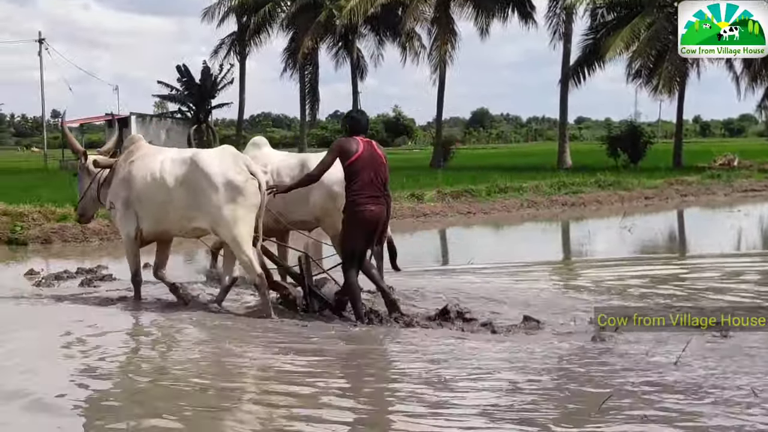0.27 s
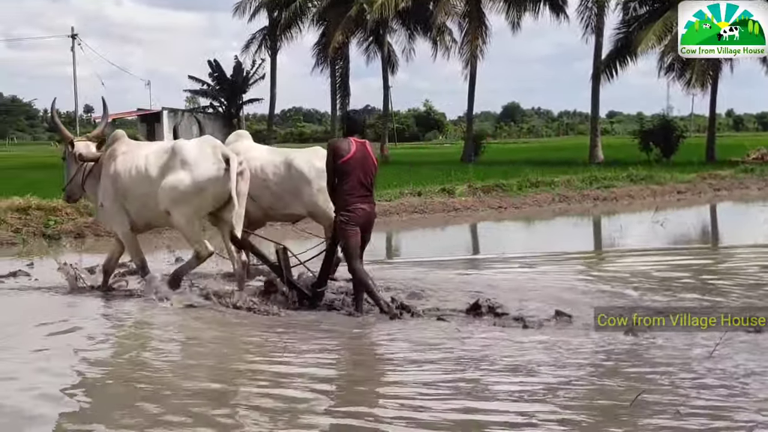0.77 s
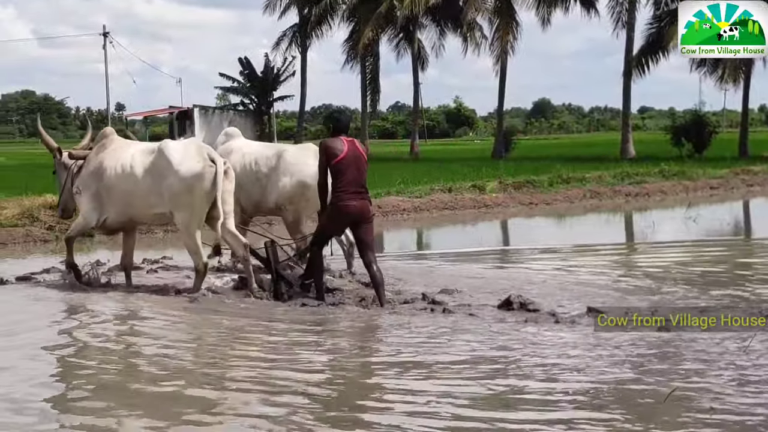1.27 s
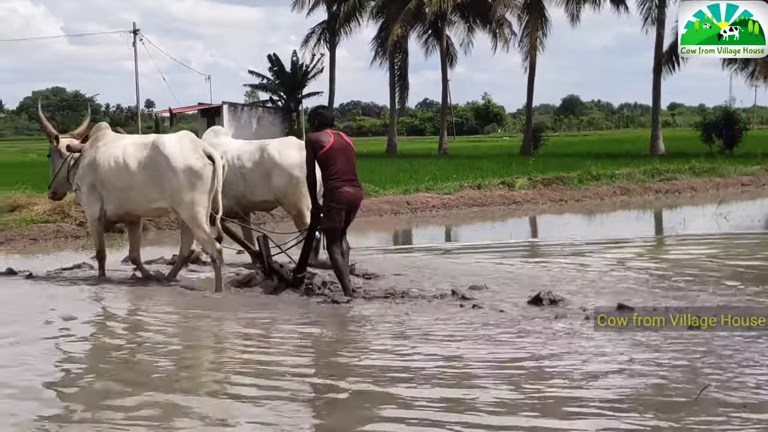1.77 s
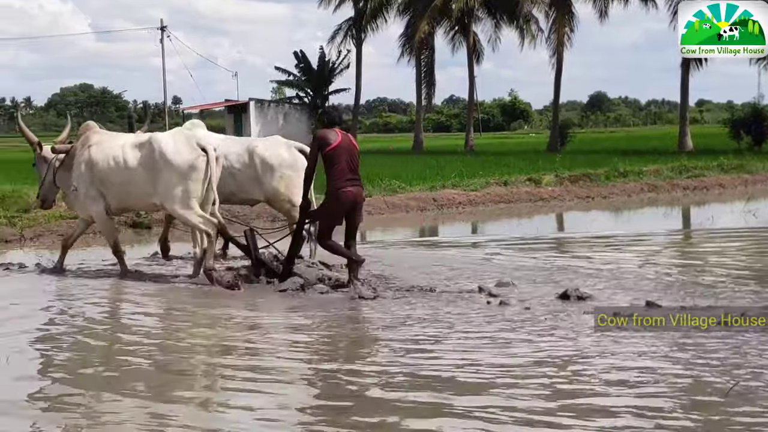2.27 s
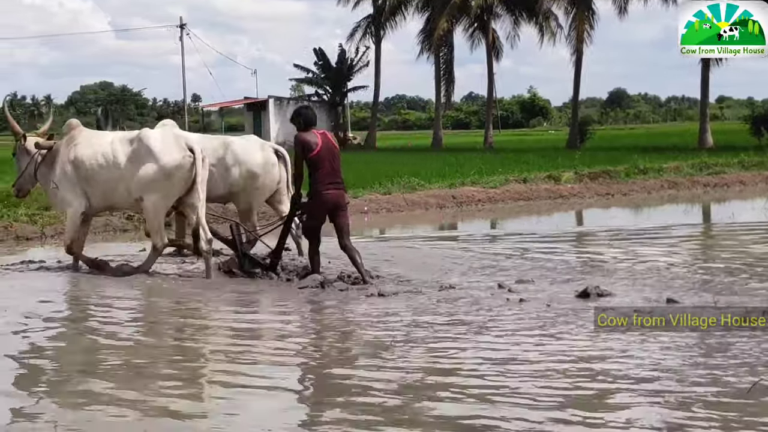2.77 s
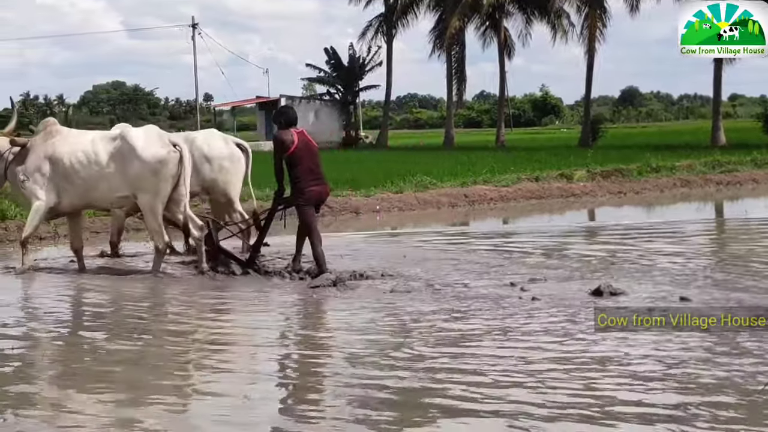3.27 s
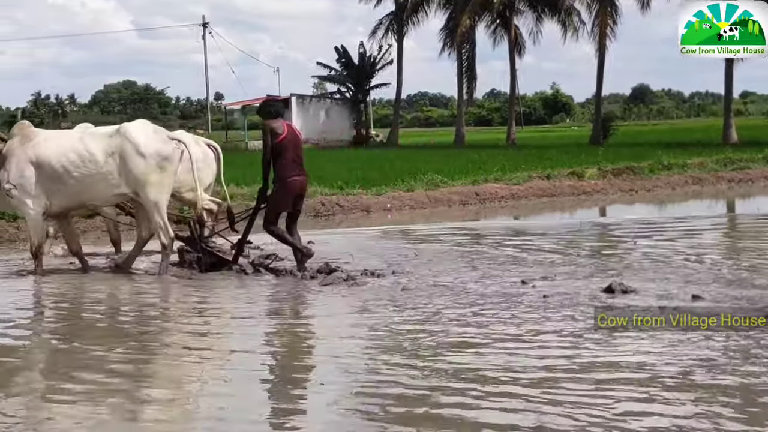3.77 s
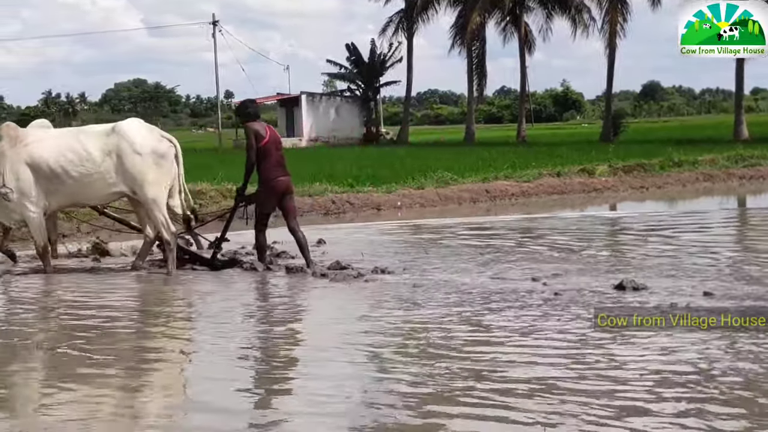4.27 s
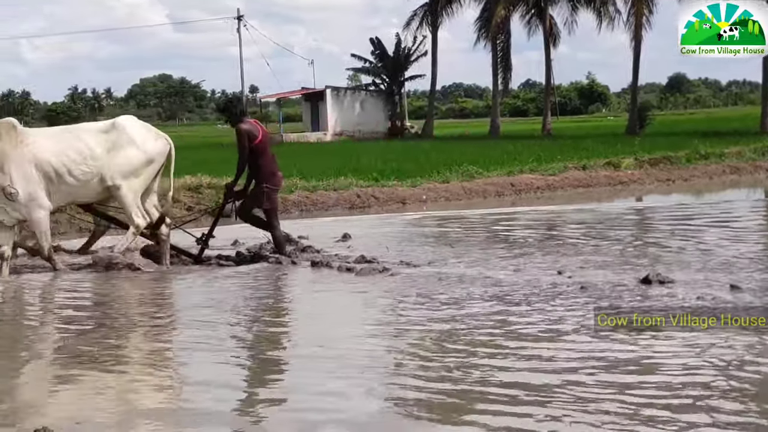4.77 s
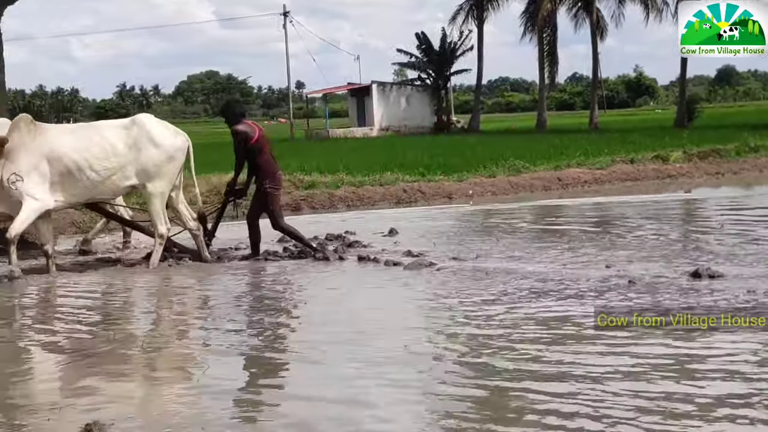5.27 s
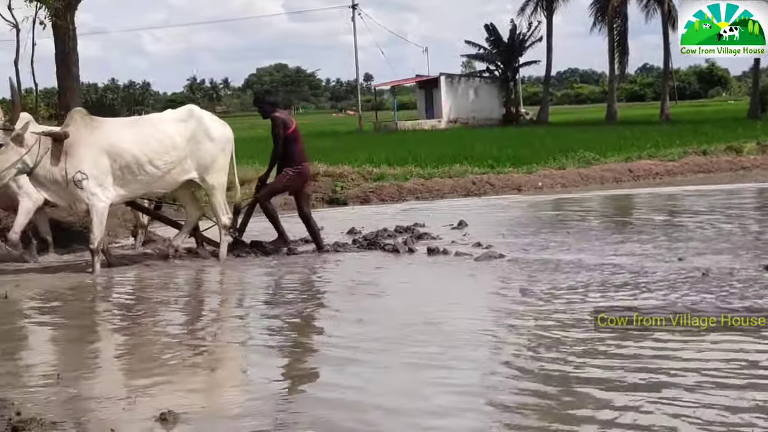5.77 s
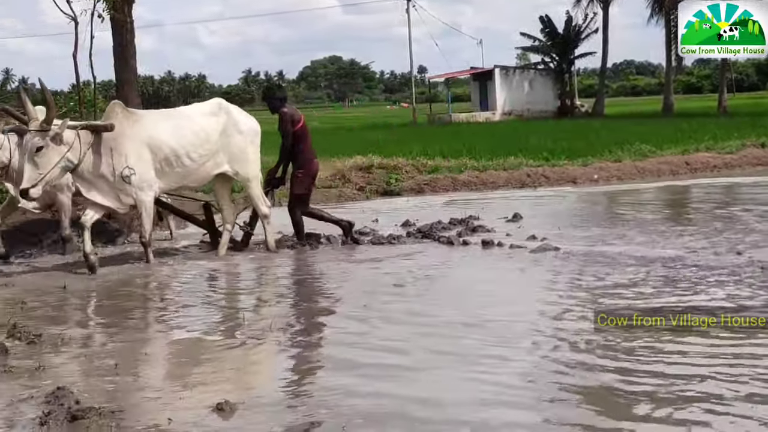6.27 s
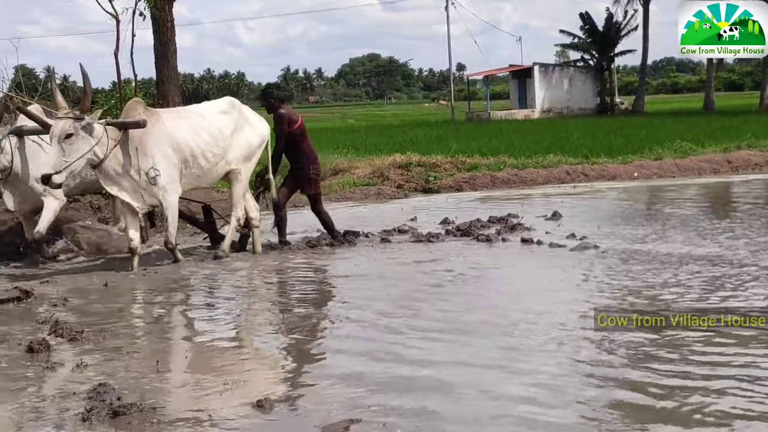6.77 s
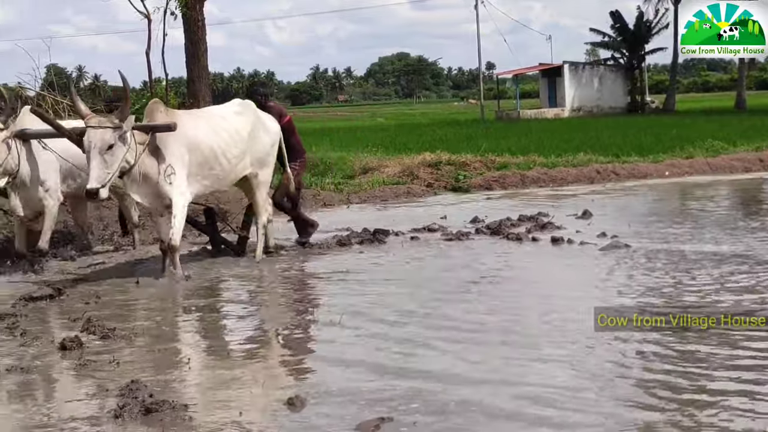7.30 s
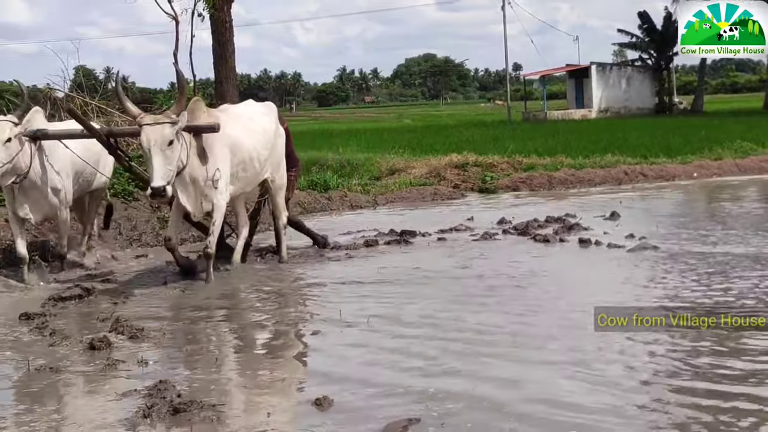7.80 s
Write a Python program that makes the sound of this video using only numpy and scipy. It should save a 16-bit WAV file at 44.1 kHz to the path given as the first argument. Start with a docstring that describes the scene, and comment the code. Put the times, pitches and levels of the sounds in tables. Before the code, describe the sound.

Two bullocks and a person wade with a plough through a flooded, muddy field, some metres from the microphone. For all eight seconds the water sloshes, gurgles and trickles, swelling softly with steps about two to four times a second. Hooves and feet make bubbly plops, the clearest near 0.3, 1, 1.2, 3 and 7.1 seconds. Thicker churns of mud come around 0.5, 4, 4.4, 5.3, 6.4 and 7.8 seconds. Thrown water lands in short, light smacks, sharper between about 4.8 and 7.4 seconds.

Over this, wind buffets the microphone with a lumpy low rumble, harder on the left. It is gusty from the start, with a few dull thumps in the first 1.5 seconds, and stays uneven until about 4 seconds. It eases around 5 to 6.7 seconds, then returns with gusts near 6.9 and 7.7 seconds.

```python
"""A flooded muddy field: two bullocks and a plough wade through it, some metres from a phone.
Legs and plough churn mud and water into rushing noise, ringing bubbles and droplets.
Hooves and feet trap big bubbles that plop; thrown water lands in short smacks.
Wind eddies buffet the two microphone ports with a lumpy rumble, the left one harder."""
import sys
import numpy as np
from scipy import signal
from scipy.fft import rfft, irfft, next_fast_len
from scipy.io import wavfile
from scipy.ndimage import uniform_filter1d, map_coordinates

SR = 44100
rng = np.random.default_rng(int(sys.argv[2]) if len(sys.argv) > 2 else 0)


def wrap_up_sound(samples):
    """Save the sound to the file named by the first command line argument, as 16-bit audio."""
    columns = np.atleast_2d(samples).T
    # keep every value between -1 and 1, then stretch to whole-number steps
    tamed = np.clip(columns, -1, 1)
    steps = np.round(tamed * 32767).astype(np.int16)
    wavfile.write(sys.argv[1], SR, steps)


N = 354519
CONTROL_HZ = 200


def amp(db):
    return 10 ** (np.asarray(db) / 20)


def unit_rms(x):
    return x / np.sqrt(np.mean(x ** 2, axis=-1, keepdims=True) + 1e-20)


def log_interp(points, hz):
    """(freq_hz, value) points read on a log axis."""
    freq_hz, values = np.transpose(points)
    return np.interp(np.log(hz + 1), np.log(freq_hz + 1), values)


def curves(rows):
    """One value per sample for each column after time_s."""
    time_s, *columns = np.transpose(rows)
    return [np.interp(np.arange(N) / SR, time_s, column) for column in columns]


def wobble(rate_hz):
    """Smooth random curve through knots at rate_hz."""
    knots = rng.standard_normal(int(N * rate_hz / SR) + 4)
    return map_coordinates(knots, [np.arange(N) * rate_hz / SR])


def filtered(x, response):
    """FFT filter with gain response(hz)."""
    size = next_fast_len(N + SR // 2)
    return irfft(rfft(x, size) * response(np.fft.rfftfreq(size, 1 / SR)), size)[..., :N]


def low(hz, edge_hz):
    """Low-pass gain of a crossover."""
    return 1 / np.sqrt(1 + (hz / edge_hz) ** 8)


def high(hz, edge_hz):
    """High-pass gain of a crossover."""
    return np.sqrt(1 - low(hz, edge_hz) ** 2)


def layered(x, body, top):
    """Dull band times body, bright band times top, middle band times their geometric mean."""
    dull, middle, bright = filtered(
        x, lambda f: np.array([low(f, 2690), high(f, 3110) * low(f, 5170), high(f, 5060)])[:, None])
    return dull * body + middle * np.sqrt(body * top) + bright * top


def minimum_phase(gain):
    """Gain curve with the phase of a body that rings only after it is struck."""
    cepstrum = irfft(np.log(gain))
    half = cepstrum.shape[-1] // 2
    return np.exp(rfft(cepstrum * np.r_[1, np.full(half - 1, 2), 1, np.zeros(half - 1)]))


def patchy_noise(depth_db):
    """Two white noises under one field of random time-frequency gain patches."""
    spectra = signal.stft(rng.standard_normal((2, N)), nperseg=256)[2]
    field = uniform_filter1d(rng.standard_normal(spectra.shape[1:]), size=6, axis=0)
    field = uniform_filter1d(field, size=8, axis=1)
    patched = spectra * amp(depth_db * field / field.std())
    return unit_rms(signal.istft(patched, nperseg=256)[1][:, :N])


def rings(start_s, level_db, pitch_hz, cycles, rise, samples):
    """Damped sines, two streams of unrelated phase; per lifetime: -21 dB, pitch up by the share rise."""
    age = np.arange(samples) / SR * (pitch_hz / np.maximum(cycles, .5))[:, None]  # in lifetimes
    start_turns = rng.random((len(start_s), 2)).T[:, :, None]
    phase = 2 * np.pi * (cycles[:, None] * (age + rise * age * age / 2) + start_turns)
    waves = amp(level_db[:, None] - 21.0 * age) * (1 - np.exp(-age / 0.026)) * np.sin(phase)
    index = (start_s * SR).astype(int)[:, None] + np.arange(samples)
    return np.array([np.bincount(index.ravel(), w.ravel(), N + samples)[:N] for w in waves])


def swarm(level_db, mid_hz, octaves, cycles, spread_db, clump, count, samples):
    """Random rings in clumps, crowding where the level is high, a few louder than the rest."""
    odds = np.cumsum(np.exp(clump * wobble(14)) * amp(.6 * level_db))
    when, strength, life = rng.random((count, 3)).T
    onset = np.minimum(np.searchsorted(odds, when * odds[-1]), N - 1)
    pitch_hz = np.minimum(mid_hz * 2 ** (octaves * rng.standard_normal(count)), 16000)
    ring_db = level_db[onset] - spread_db * np.log(strength + 0.02)
    return rings(onset / SR, ring_db, pitch_hz, cycles * (.5 + life), rise=0.16, samples=samples)


def buffet(level_db, upper_db):
    """Eddies on one port: lumpy rumble whose upper parts grow faster than the gust and come in spikes."""
    # wind spectrum on a port: freq_hz, gain_db
    rumble = [(7.1, -34), (12, -1.5), (45, -2), (90, -0.5), (185, -8.5), (292, -18.5), (412, -29),
              (600, -37), (780, -65), (1320, -120)]
    lumps, ragged_db = wobble(34), 2.16 * wobble(12)
    noise = unit_rms(filtered(rng.standard_normal(N), lambda f: amp(log_interp(rumble, f))))
    deep, edge = filtered(noise, lambda f: [low(f, 123), high(f, 196)])
    deep_eddies = unit_rms(amp(1.7 * lumps) * deep)
    spikes = 0.65 + 1.28 * np.tanh(deep_eddies / 2) ** 2  # fine eddies ride the crests of large ones
    upper = (noise - deep - edge) * amp(0.33 * lumps) + edge * spikes * amp(3.04 * lumps - 0.5)
    eddies = deep_eddies + upper * amp(0.81 * (level_db + 32) + upper_db)
    skewed = eddies + 0.05 * (eddies ** 2 - 1)  # peaks sharper than troughs
    return amp(level_db + ragged_db) * 5 * np.tanh(skewed / 5)


def slaps(gust_db):
    """Sudden eddies slap the left port, one short push each; small ones come at random with the gusts."""
    # big eddies: start_s, level_db
    eddies = [(0.349, -34), (0.634, -29), (0.967, -44), (1.082, -43), (1.311, -36), (1.381, -36),
              (1.47, -31.5), (3.125, -44), (7.58, -36)]
    start_s, level_db = np.transpose(eddies)
    pitch_hz, cycles = np.full(len(eddies), 170.), np.full(len(eddies), 1.3)
    big = rings(start_s, level_db + 12.5, pitch_hz, cycles, rise=0, samples=1200)[0]
    small = swarm(gust_db - 3.5, 209, octaves=.4, cycles=1.43, spread_db=3.0,
                  clump=.8, count=110, samples=1200)[0]
    return filtered(big + small, lambda f: low(f, 470))


def left_wind():
    """Gusts buffet and slap the exposed port."""
    # gust strength: time_s, level_db
    gusts = [(0.0, -31.5), (0.26, -35), (0.38, -27), (0.58, -31.5), (0.73, -26.5), (0.92, -43), (1.03, -31),
             (1.15, -38.5), (1.33, -31), (1.57, -30), (1.65, -37), (2.07, -30.5), (2.9, -31), (2.95, -46),
             (3.03, -53.5), (3.08, -28.5), (3.32, -28.5), (3.4, -34.5), (4.15, -35.5), (4.99, -38),
             (5.06, -43.5), (5.45, -50.5), (5.7, -44.5), (5.92, -35), (6.05, -40.5), (6.23, -47),
             (6.36, -40.5), (6.78, -50.5), (6.86, -29), (6.99, -32.5), (7.5, -31), (7.73, -24.5),
             (8.03, -34)]
    gust_db, = curves(gusts)
    return buffet(gust_db, upper_db=-1.0) + slaps(gust_db)


def right_wind():
    """The sheltered port catches separate puffs; each climbs to a peak and falls back to the calm."""
    # puffs: peak_s, level_db
    puffs = [(0.16, -34), (0.44, -26.5), (0.52, -31.5), (0.81, -31), (0.91, -38), (1.47, -41), (1.73, -36),
             (2.08, -36), (2.35, -32.5), (2.64, -34), (2.92, -35.5), (3.2, -37), (3.53, -35), (3.67, -35),
             (3.8, -34), (4.14, -35), (4.91, -43), (5.17, -41.5), (5.7, -40), (5.92, -37.5), (6.84, -34.5),
             (7.39, -39.5), (7.62, -41), (7.85, -40)]
    # wind between puffs: time_s, level_db
    calm = [(0.0, -44.5), (0.5, -37), (1.15, -44), (1.8, -43.5), (2.3, -41), (2.55, -46.5), (3.05, -49.5),
            (3.7, -39), (4.2, -45.5), (5.55, -56), (5.95, -41), (6.3, -49.5), (6.9, -44), (7.15, -54),
            (7.45, -44), (8.03, -46)]
    rise_db_per_s, fall_db_per_s = 204, 162
    peak_s, level_db = np.transpose(puffs)[:, :, None]
    t = np.arange(0, N / SR, 1 / CONTROL_HZ)
    ramps_db = level_db + np.minimum(rise_db_per_s * (t - peak_s), -fall_db_per_s * (t - peak_s))
    puff_db, = curves(np.transpose([t, ramps_db.max(axis=0)]))
    calm_db, = curves(calm)
    return buffet(np.maximum(puff_db, calm_db), upper_db=2.7)


def ports(pair):
    """Two unrelated streams become left and right: partly alike, then coloured by each port."""
    # left-right likeness of the water: freq_hz, correlation
    likeness = [(500, 1), (1000, 0.94), (1500, 0.74), (1780, 0.48), (2100, 0.49), (2450, 0.85),
                (2800, -0.18), (3250, 0.84), (3600, -0.42), (4250, 0.31), (4700, 0.85), (5200, 0.3)]
    # lift from the echo off the water and the phone's body: centre_hz, width_hz, left_db, right_db
    bands = [(818, 305, 7, 10.5), (1423, 365, 7.5, 9.5), (2174, 412, 8.5, 11), (3280, 370, 2, 4.5),
             (3964, 330, 2, 6.5), (4670, 270, 4.5, 10), (5730, 140, -2.5, 8), (11380, 710, 3, 7.5)]
    # left phase lead, a full turn across the ports' dip: freq_hz, lead_rad
    lead = [(1660, 0), (1800, 3.5), (2030, 5), (2300, 6.5), (2650, 6.5)]
    # left port response: freq_hz, gain_db
    left_port = [(300, -8), (600, -9), (2500, -6.5), (3000, -12), (8300, -12), (9600, -8.5), (14300, -8)]
    # right port response: freq_hz, gain_db
    right_port = [(300, -6.5), (600, -13.5), (2800, -11), (5500, -17), (8500, -18), (9500, -26.5),
                  (14300, -29.5)]

    def blend(hz):
        angle = np.arccos(np.clip(log_interp(likeness, hz), -1, 1)) / 2
        return [np.cos(angle), np.sin(angle)]

    def colour(hz):
        lift_db = sum(np.outer([left_db, right_db], np.exp(-2 * ((hz - centre_hz) / width_hz) ** 2))
                      for centre_hz, width_hz, left_db, right_db in bands)
        port_db = [log_interp(left_port, hz), log_interp(right_port, hz)]
        right_lag = np.exp(-1j * np.outer([0, 1], log_interp(lead, hz)))
        return right_lag * minimum_phase(amp(lift_db + port_db))
    mid, side = filtered(pair, blend)
    return filtered(np.array([mid + side, mid - side]), colour)


def smacks():
    """Thrown water lands: a short noise burst that trails into spray, bright top over a duller body."""
    # landings: start_s, level_db, t60_s, body_offset_db
    landings = [(0.2175, -49.5, 0.009, 8), (0.257, -46.5, 0.044, -3), (0.4625, -53, 0.026, -19),
                (0.9993, -50.5, 0.018, 2.5), (1.23, -45.5, .022, -13), (1.7225, -49, 0.024, -1.5),
                (2.571, -47.5, 0.014, -16), (3.924, -57, 0.022, 7.5), (4.8524, -38.5, 0.0062, -10.5),
                (5.1178, -45, .012, -3), (5.4817, -41.5, 0.0075, -30), (5.706, -42, 0.018, -22),
                (5.7416, -47, 0.0068, 1), (6.1774, -46.5, 0.012, -9), (6.397, -60, 0.009, 16),
                (6.8897, -48, .013, -5), (7.003, -44, 0.012, -6.5), (7.4081, -40, 0.012, -25),
                (7.737, -61, 0.012, 12), (7.985, -48, 0.018, -35), (8.007, -45, 0.024, -41)]
    top, body = np.full((2, N + SR), 1e-9)
    t = np.arange(SR // 8) / SR
    attack_s, spray_t60_s = 0.0013, 0.17
    for start_s, level_db, t60_s, body_offset_db in landings:
        decay = amp(-60 * t / max(t60_s, .004)) + 0.19 * amp(-60 * t / spray_t60_s)
        envelope = amp(level_db) * decay * (1 - np.exp(-t / attack_s))
        top[round(start_s * SR):][:len(t)] += envelope * amp(23.0)
        body[round(start_s * SR):][:len(t)] += envelope * amp(body_offset_db + 23.5)
    return layered(rng.standard_normal((2, N)), body[:N], top[:N])


def plops():
    """Hooves and feet trap a large bubble; the surface snaps briefly as it closes over."""
    # big bubbles: start_s, level_db, nominal_hz
    bubbles = [(0.018, -29.5, 1130), (0.167, -30, 2320), (0.262, -25, 2300), (1.001, -32, 2330),
               (1.231, -29.5, 2300), (1.723, -36, 2200), (1.937, -35.5, 833), (2.528, -32, 1220),
               (2.569, -32, 2280), (2.65, -35.5, 2180), (2.937, -30, 3340), (3.064, -37, 740),
               (3.088, -34.5, 2000), (3.182, -38, 2120), (3.245, -37, 1440), (3.258, -29.5, 4650),
               (3.317, -41, 1520), (3.411, -35, 2100), (3.924, -34, 2450), (3.938, -34, 870),
               (4.297, -34.5, 875), (4.332, -36.5, 665), (4.387, -35, 910), (4.587, -32.5, 1920),
               (4.985, -34, 2340), (5.018, -35.5, 1300), (5.25, -36, 834), (5.305, -38, 920),
               (5.641, -35, 2140), (5.696, -35, 700), (5.74, -38.5, 2200), (5.931, -31.5, 920),
               (6.332, -30.5, 543), (6.377, -38, 2130), (6.399, -33.5, 1000), (6.419, -36, 1550),
               (6.544, -38, 2250), (6.573, -40, 1010), (6.647, -45, 1500), (6.944, -33, 2300),
               (7.133, -28, 1660), (7.546, -34, 850), (7.644, -35, 2200), (7.678, -32.5, 2020),
               (7.704, -31, 1950), (7.736, -33, 675), (7.755, -39, 1360), (7.767, -42, 2250),
               (7.866, -38.5, 1550), (7.883, -39.5, 850)]
    start_s, level_db, nominal_hz = np.transpose(bubbles)
    cycles = 11 + nominal_hz / 500
    ring = rings(start_s, level_db - 1.0, nominal_hz * 0.964, cycles, rise=0.11, samples=1400)
    snap_hz = np.sqrt(nominal_hz * 1500) * 2 ** (0.27 * rng.standard_normal(len(bubbles)))
    snap = rings(start_s, level_db - 3.5, snap_hz, np.full(len(bubbles), 3.5), rise=0.03, samples=300)
    return ring + snap


def wading_db():
    """Mud, slosh and spray levels: each step swells quickly and settles a little more slowly."""
    # water between steps: time_s, mud_db, slosh_db, spray_db
    base = [(0.0, -57, -54, -58), (0.9, -57, -54.5, -58), (1.45, -57.5, -55.5, -59), (1.7, -59, -59, -63),
            (2.4, -60.5, -57.5, -62), (3.13, -62, -60, -65), (3.8, -66.5, -61.5, -66.5),
            (4.3, -62, -61, -64), (5.6, -61, -61, -63), (6.8, -60, -61.5, -60), (7.3, -61, -63, -63),
            (8.03, -61.5, -62, -60)]
    # a leg drives through the water: peak_s, mud_lift_db, slosh_lift_db, spray_lift_db
    steps = [(0.08, 3, 3, 1), (0.47, 7, 4, 2), (0.8, 3, 3, 0.5), (1.74, 2, 4, 3), (1.98, 5, 5, 2),
             (2.25, 2, 3.5, 2), (2.54, 5, 3, 1), (3.05, 4, 1, 0), (3.25, 5, 2, 0), (3.55, 4, 2, 2),
             (3.95, 10, 5, 2), (4.201, 0, 1, 4), (4.4, 10, 3, 1.5), (4.62, 4, 3.5, 4), (4.97, 4, 5, 5),
             (5.19, 0, 0, 3.5), (5.28, 8, 2.5, 1), (5.49, 0, 0.5, 5), (5.92, 6, 4, 3), (6.36, 7, 4, 2),
             (6.57, 4, 3, 2), (6.82, 3, 1, 1), (6.93, 4, 4, 4), (7.21, 5, 3, 1), (7.42, 2, 3, 5),
             (7.77, 7, 3.5, 1), (8.03, 0, 1, 5)]
    rise_s, fall_s = .04, .06
    peak_s, *lifts_db = np.transpose(steps)
    t = np.arange(0, N / SR, 1 / CONTROL_HZ)
    after_s = t - peak_s[:, None]
    swells = np.exp(-(after_s / np.where(after_s < 0, rise_s, fall_s)) ** 2)
    step_db = np.array(lifts_db) @ swells
    return np.add(curves(base), curves(np.transpose([t, *step_db])))


def churn():
    """Legs and plough push mud and water: rushing beds, with bubbles below and droplets above."""
    mud_db, slosh_db, spray_db = wading_db()
    surge = wobble(13)  # small waves break in every band at once
    mud = filtered(patchy_noise(depth_db=3.0), lambda f: low(f, 1710)) * amp(mud_db + 15.5 + 0.71 * surge)
    rush = filtered(patchy_noise(depth_db=2.0), lambda f: high(f, 1540)) * amp(0.95 * surge)
    rush = layered(rush, body=amp(slosh_db + 15.0), top=amp(spray_db + 18.5))
    gurgle = swarm(mud_db + 6.5, 919.5, octaves=0.566, cycles=11.1, spread_db=3.6,
                   clump=.8, count=900, samples=900)
    trickle = swarm(slosh_db + 9.5, 2366, octaves=0.407, cycles=14.3, spread_db=2.0,
                    clump=.6, count=1500, samples=400)
    drops = swarm(spray_db + 16, 6720, octaves=0.44, cycles=3.9, spread_db=4.5,
                  clump=.8, count=6000, samples=64)
    plinks = swarm(spray_db + 11.5, 4350, octaves=0.314, cycles=13, spread_db=3.5,
                   clump=.9, count=500, samples=300)
    return mud + rush + gurgle + trickle + drops + plinks


def scene():
    wind = np.array([left_wind(), right_wind()])
    water = churn() + plops() + smacks()
    return wind + ports(water)


def record(dry):
    """The phone keeps nothing outside its band limits."""
    bottom_hz, top_hz = 5, 14270
    return filtered(dry, lambda hz: (hz < top_hz) & (hz > bottom_hz))


dry = scene()
out = record(dry)
wrap_up_sound(out)
```